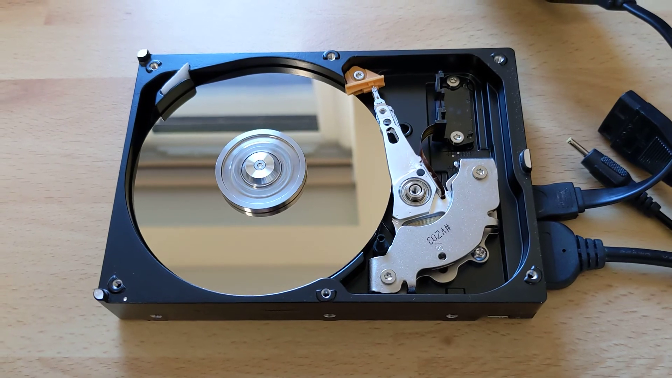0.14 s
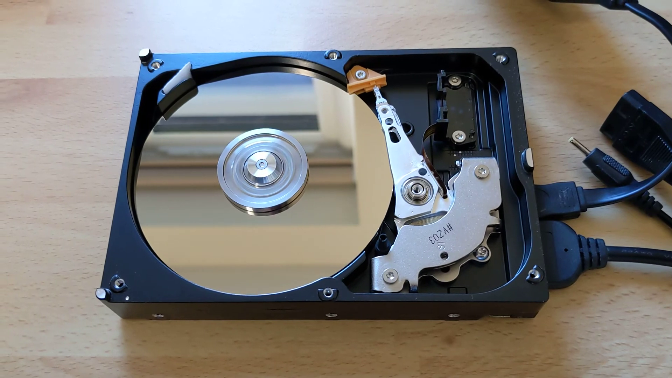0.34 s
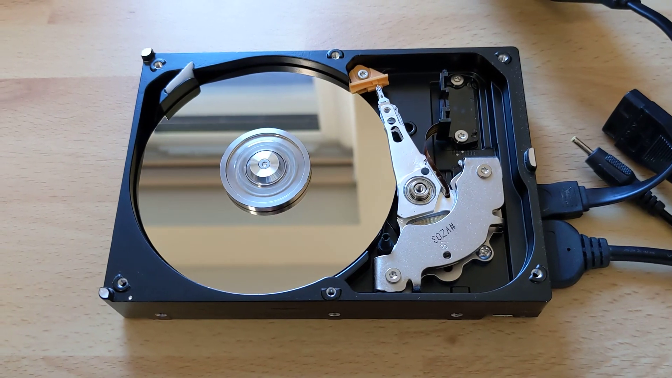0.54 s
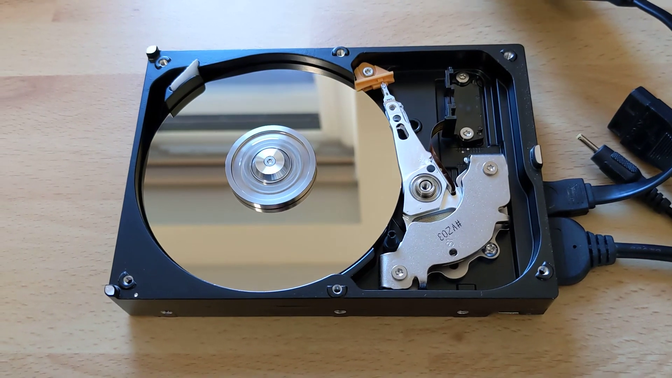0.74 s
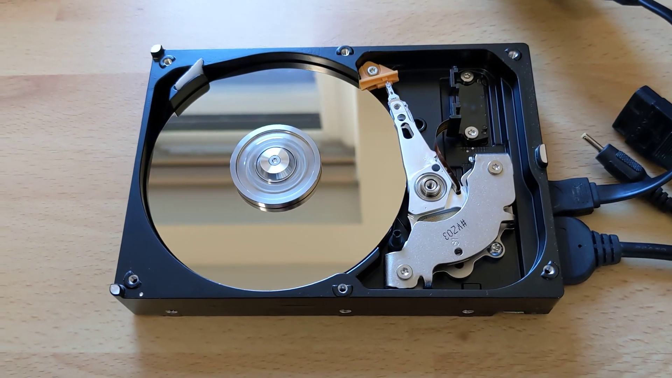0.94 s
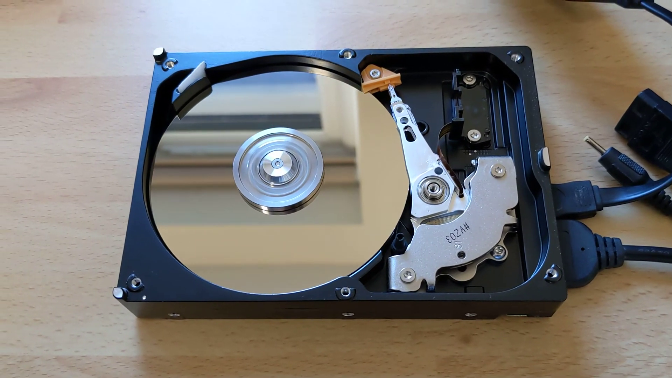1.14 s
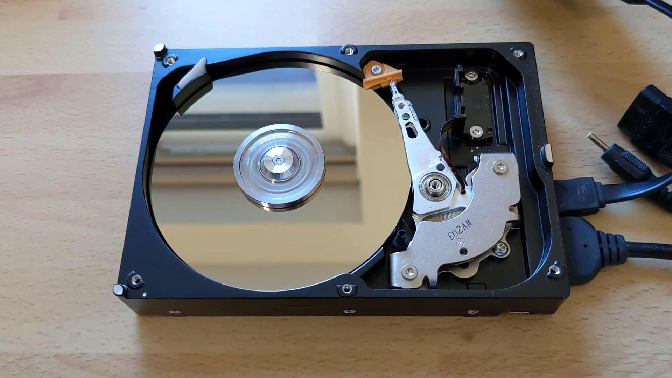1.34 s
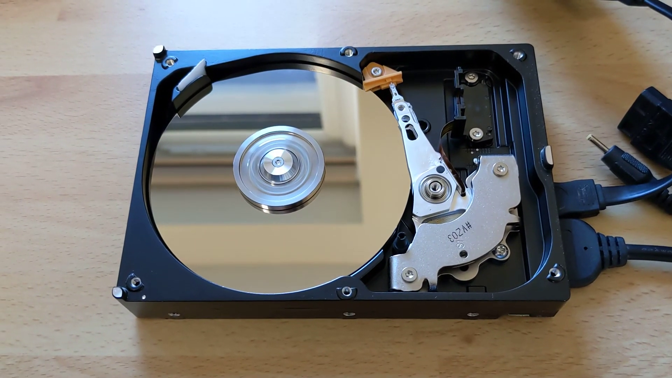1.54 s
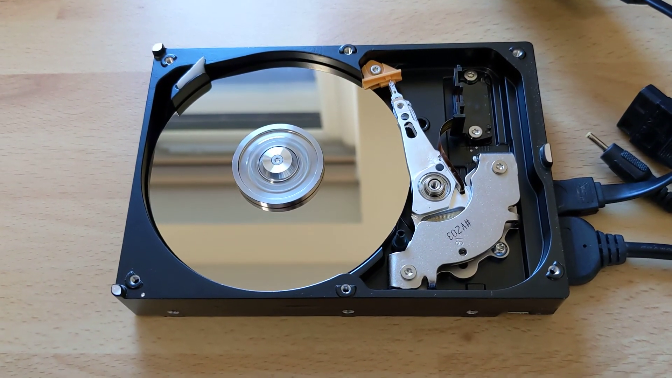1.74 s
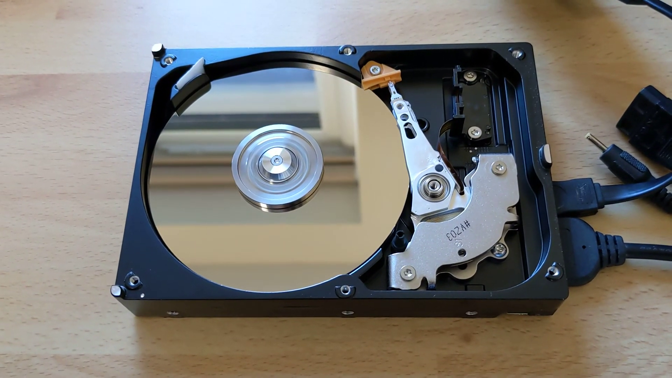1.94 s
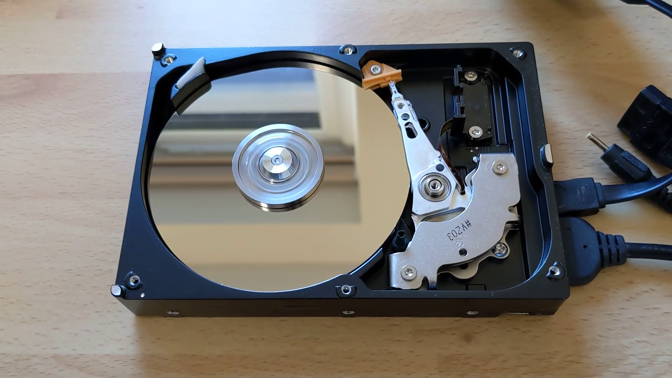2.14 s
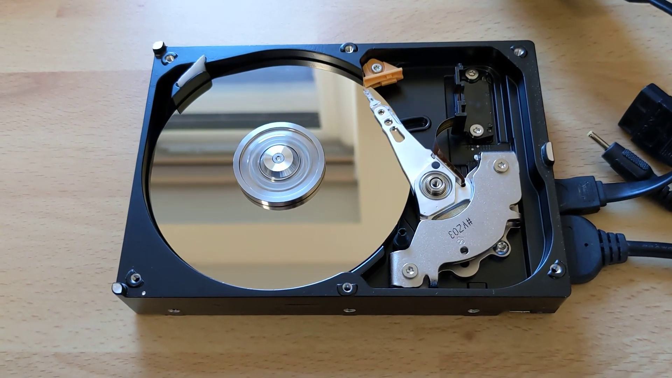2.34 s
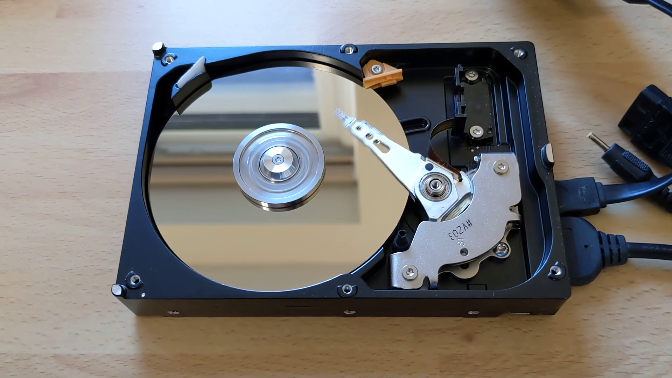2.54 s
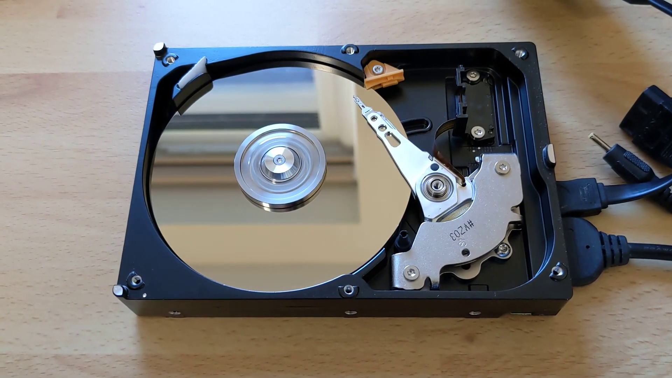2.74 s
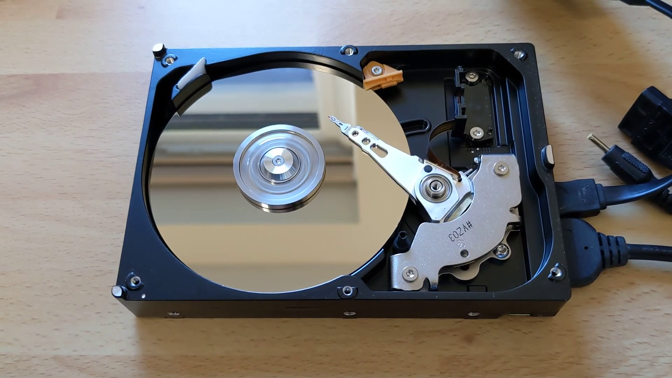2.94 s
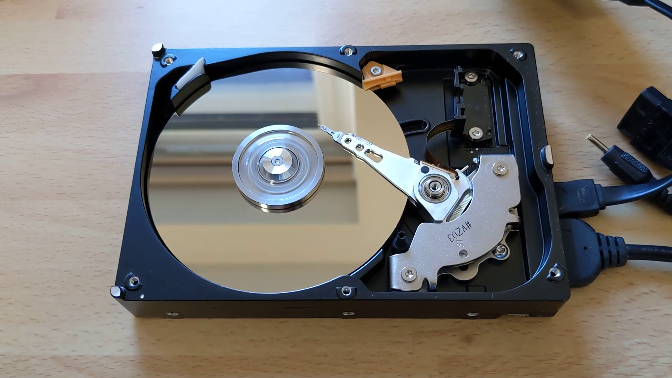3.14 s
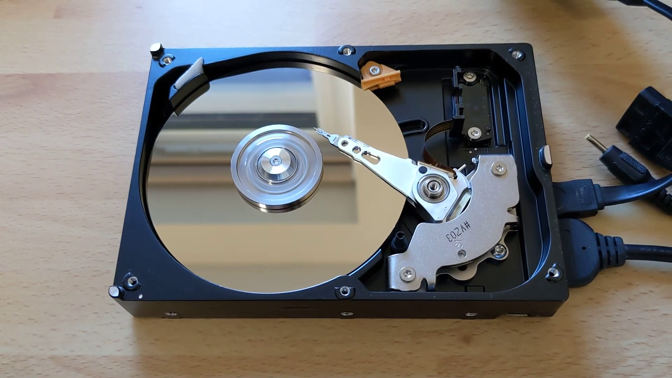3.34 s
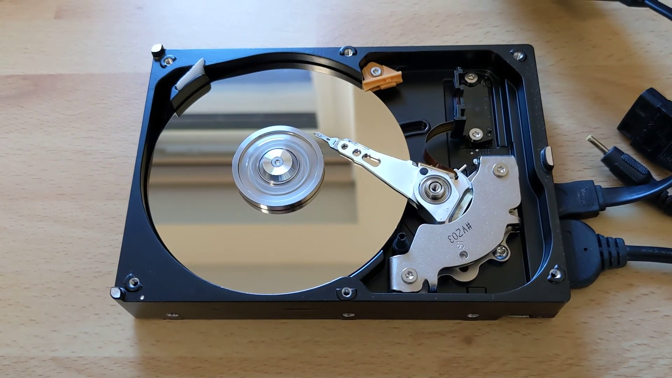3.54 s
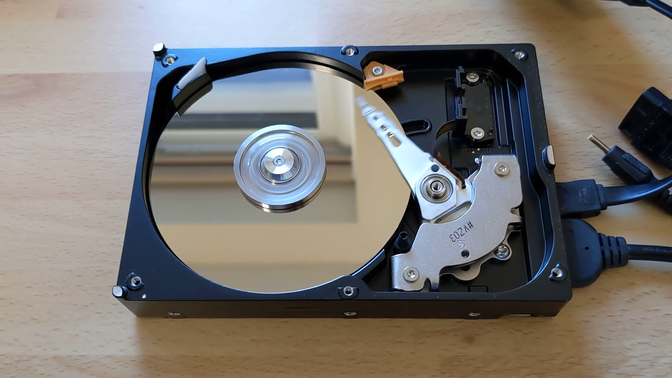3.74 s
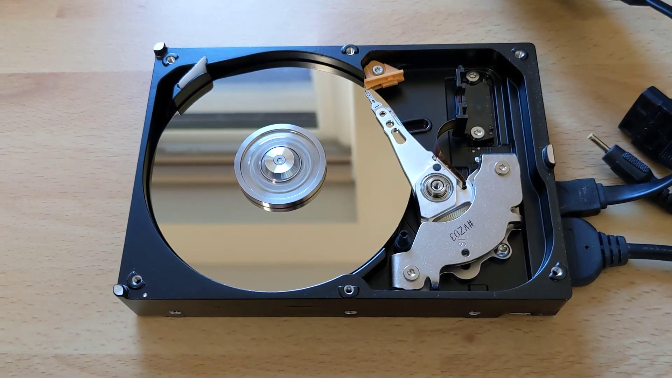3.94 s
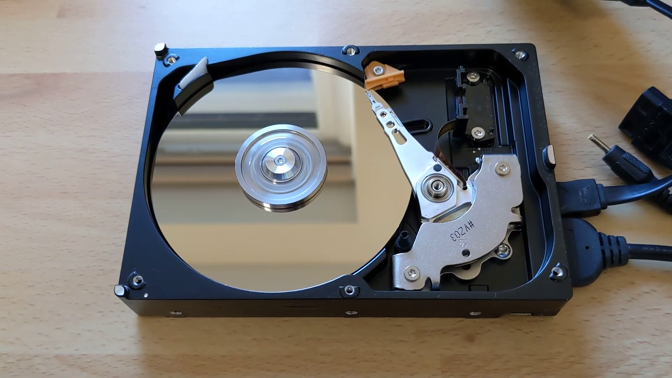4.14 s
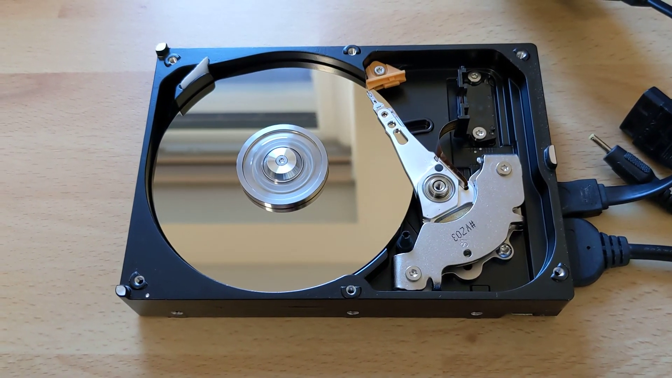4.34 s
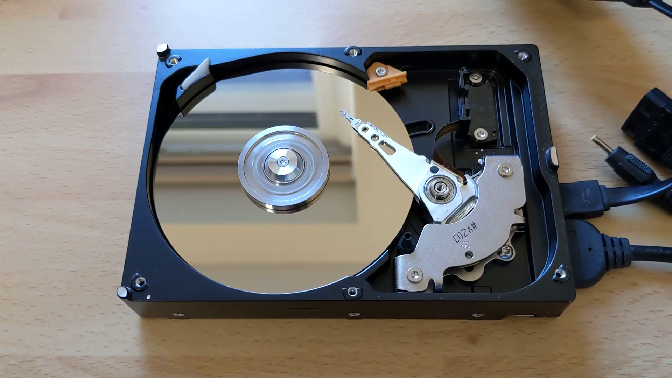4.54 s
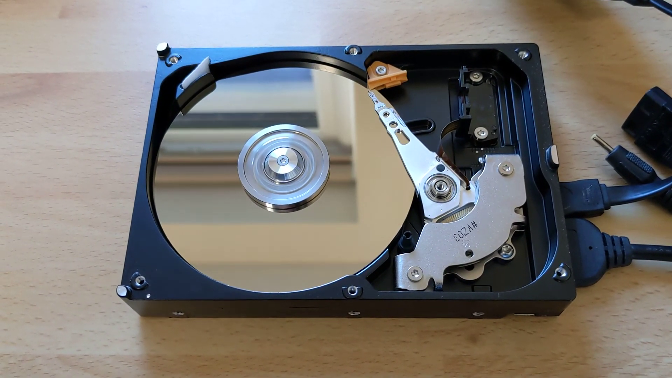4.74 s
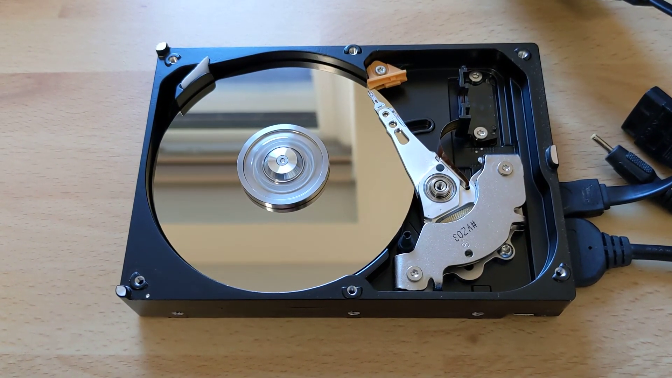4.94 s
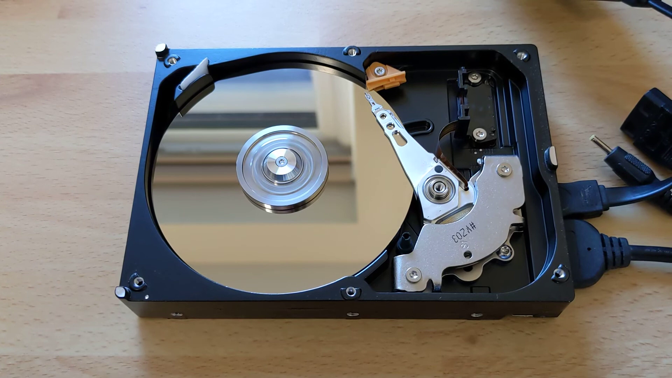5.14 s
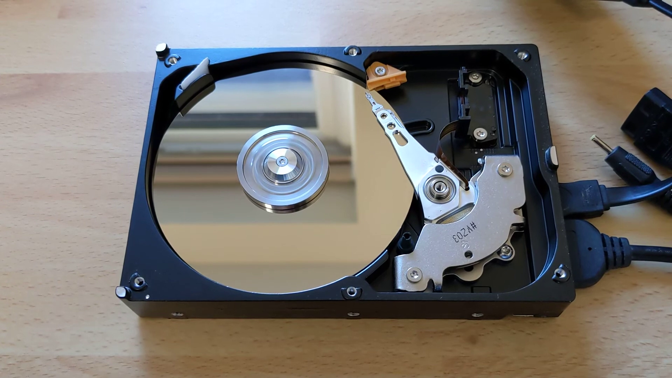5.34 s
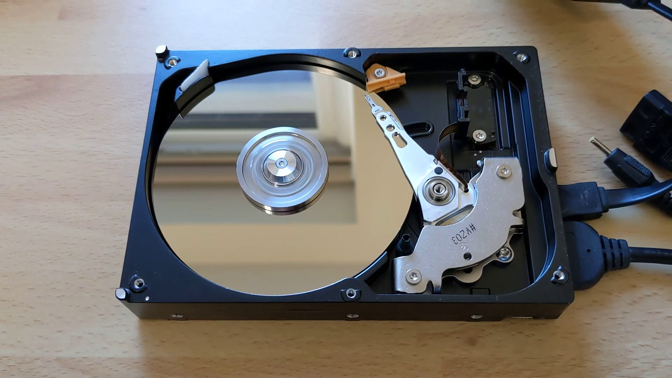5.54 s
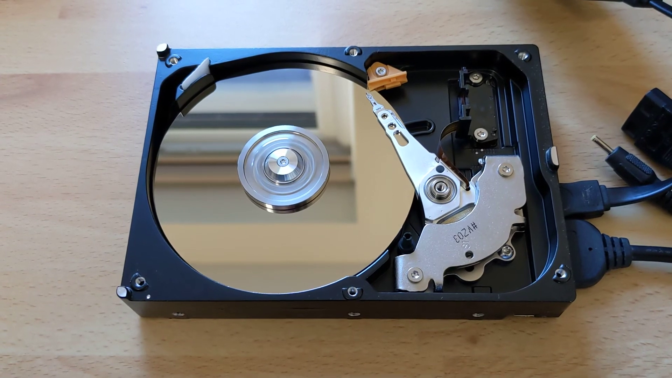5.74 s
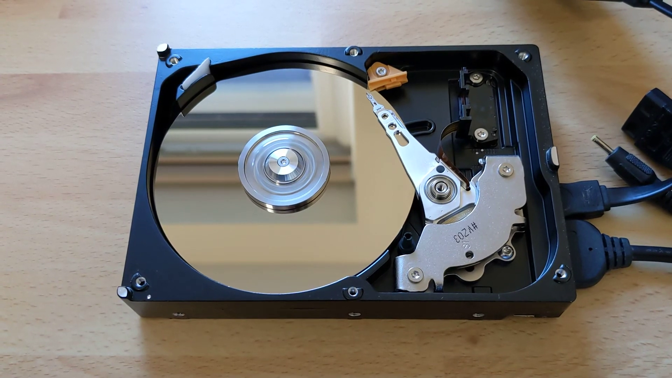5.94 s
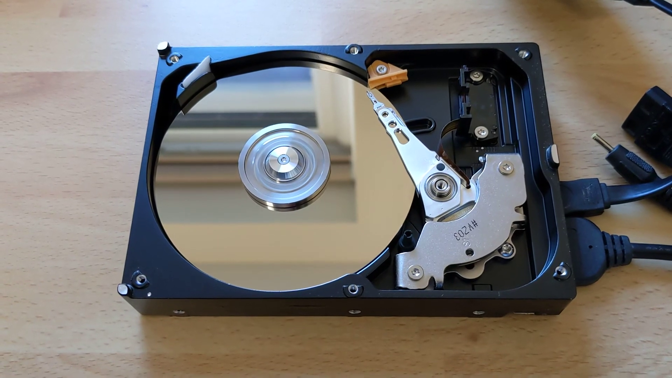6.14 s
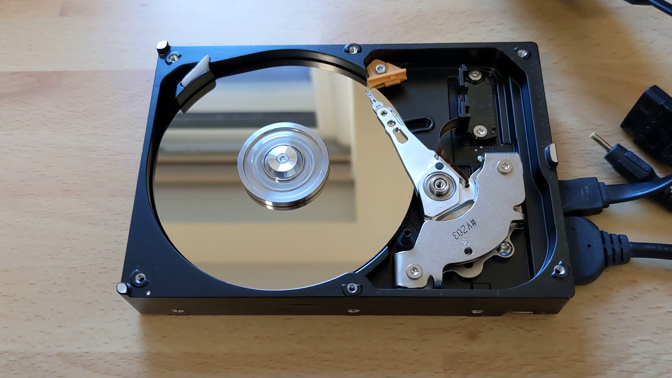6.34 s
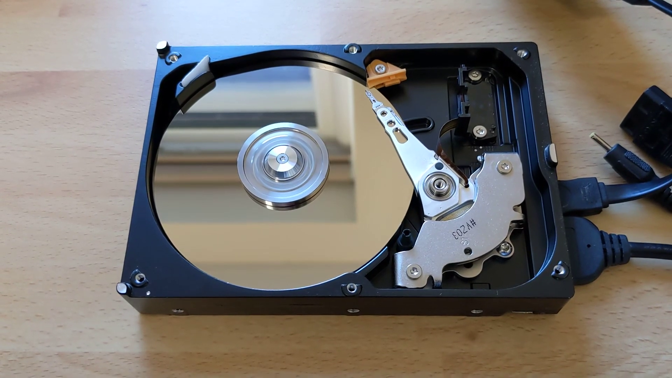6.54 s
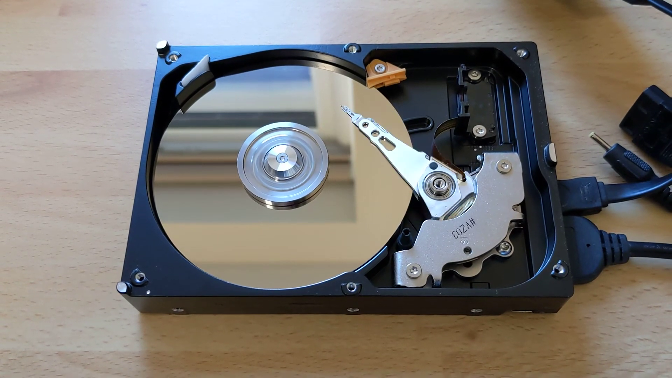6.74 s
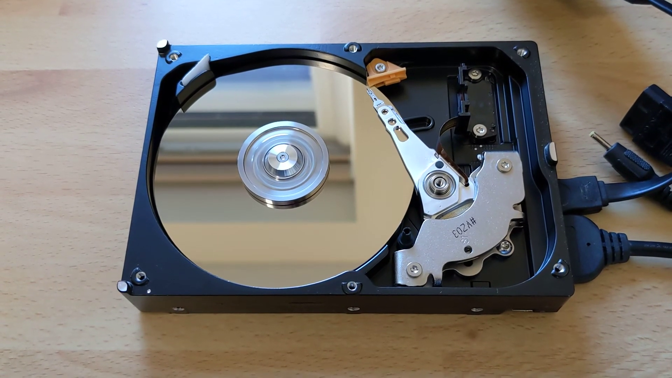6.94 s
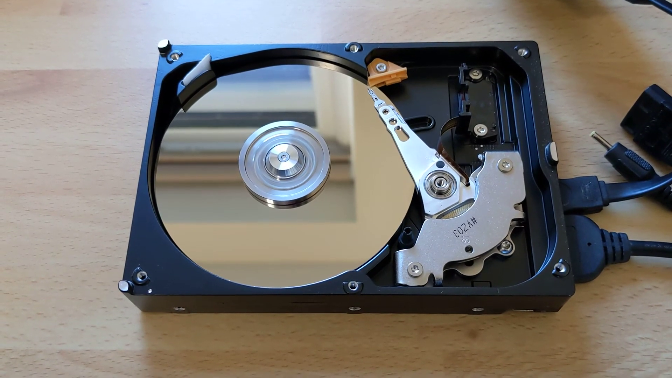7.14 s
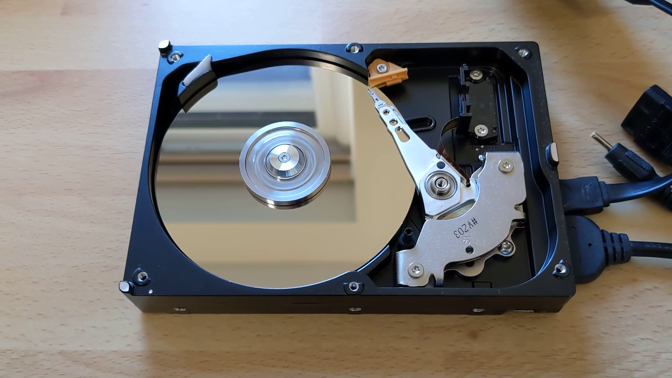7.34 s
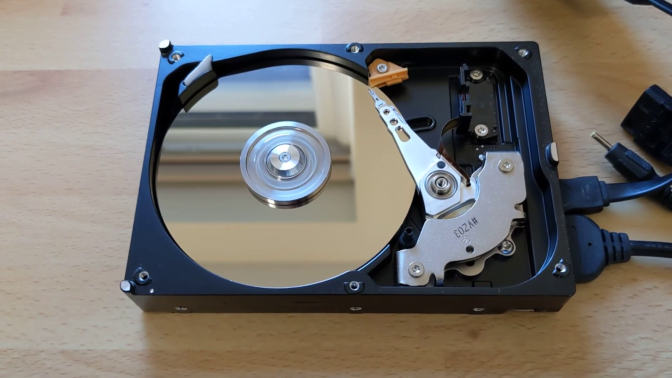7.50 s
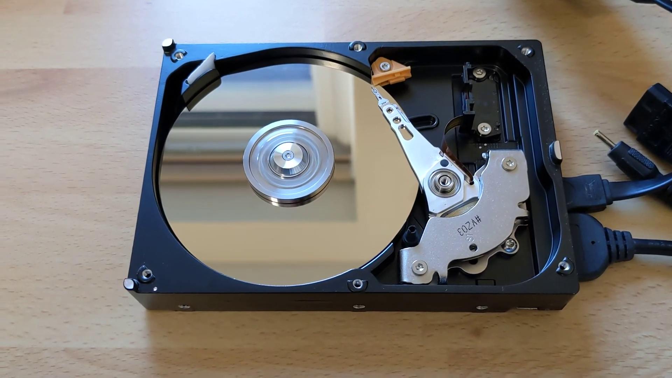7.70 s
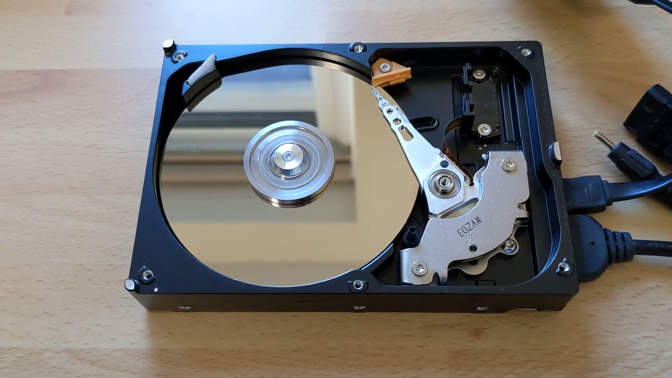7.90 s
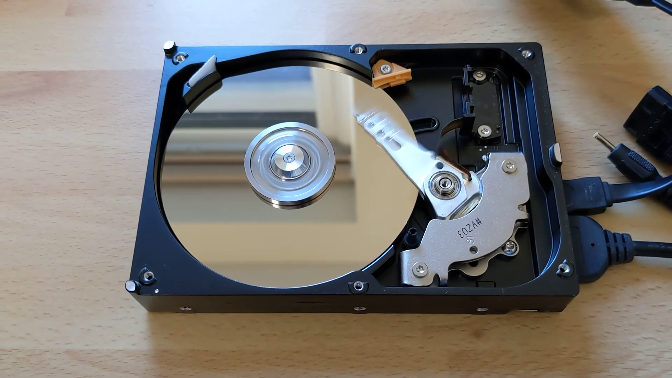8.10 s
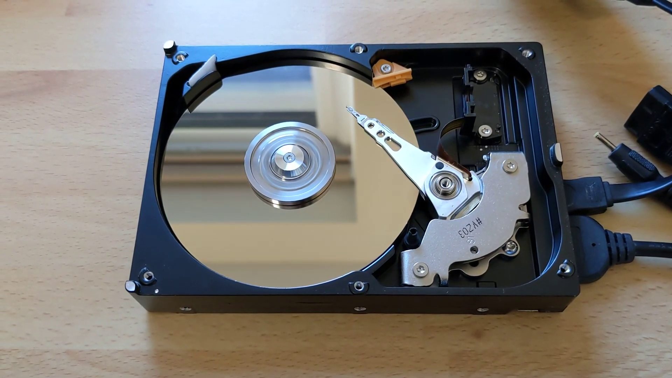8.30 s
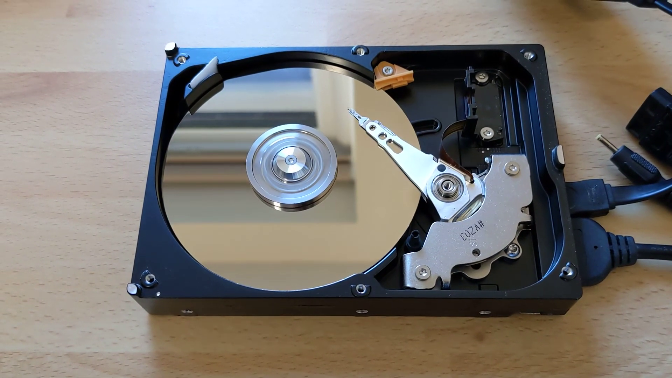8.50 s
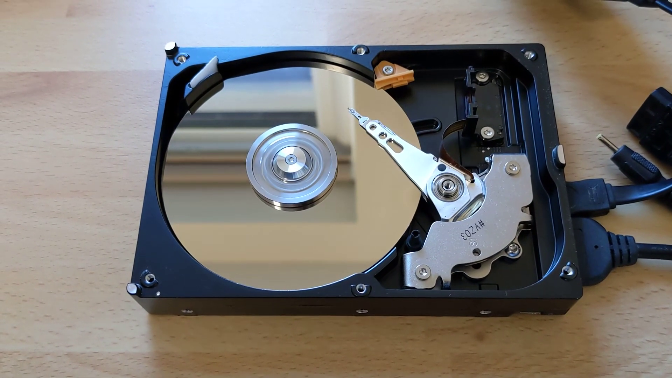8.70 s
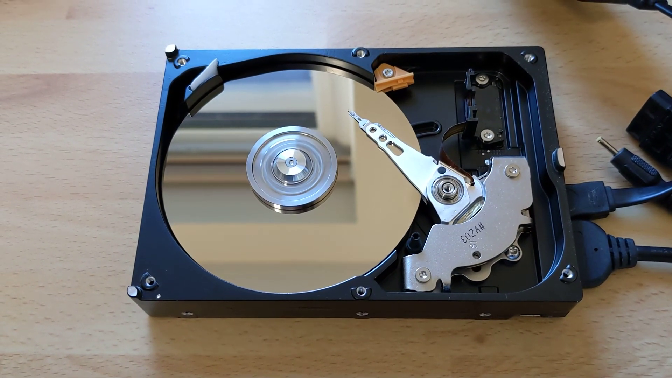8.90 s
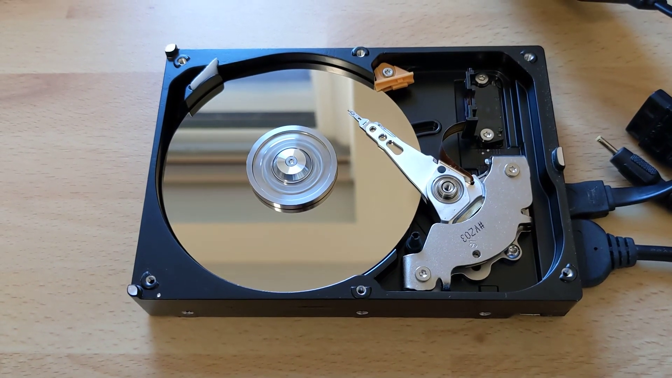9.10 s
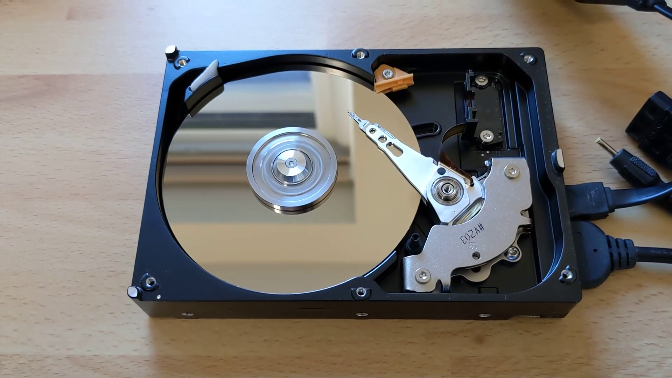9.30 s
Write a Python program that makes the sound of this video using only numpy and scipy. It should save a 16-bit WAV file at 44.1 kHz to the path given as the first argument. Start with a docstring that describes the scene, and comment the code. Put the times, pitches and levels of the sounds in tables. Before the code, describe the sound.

An open computer hard drive spins up from a soft airy whir to a steady bright hiss, its arm snapping and clicking in short bursts.

```python
"""A wooden desk in a quiet room: an open hard drive spins up to full speed, close to a phone with two ports.
Air dragged by the platters is shaped noise that grows louder and brighter with speed. The motor whines in
multiples of the shaft rate while it pulls. Each start and stop of the head arm kicks decaying modes of case
and arm, a crunch of small parts and a slower swell of the desk; once the heads sing one high tone.
Walls return a short tail, rumble and low hums lie behind, and the phone adds hiss and limits the band."""
import sys
import numpy as np
from scipy import signal
from scipy.fft import rfft, irfft, next_fast_len
from scipy.io import wavfile
from scipy.ndimage import uniform_filter1d

SR = 44100
rng = np.random.default_rng(int(sys.argv[2]) if len(sys.argv) > 2 else 0)


def unload_audio(sound):
    """Save the sound as a 16-bit wav file, at the path given as the first command line argument."""
    columns = np.transpose(np.atleast_2d(sound))
    # keep every value between -1 and 1, then stretch to whole-number steps
    steps = np.round(np.clip(columns, -1, 1) * 32767)
    wavfile.write(sys.argv[1], SR, steps.astype(np.int16))


N = 417186
TIME = np.arange(N) / SR  # s
SIZE = next_fast_len(N + 4096)
BINS_HZ = np.arange(SIZE // 2 + 1) * SR / SIZE + 1e-3  # offset keeps log and division finite

# spin-up: start speed, speed striven for, regulated speed (turns per s), time constant
START_TURNS_HZ, AIM_TURNS_HZ, FULL_TURNS_HZ, SPIN_UP_S = 59.5, 159.5, 120, 2.55
# air: reference rms before the speed law, treble step, growth per doubling of speed
AIR_DB, TREBLE_DB, AIR_DB_PER_OCT, TREBLE_DB_PER_OCT = -37.5, -2.5, 19, 11
# the arm swings in over the platters and changes the stream
LOAD_S, LOAD_TAKES_S, LOAD_DB, LOAD_TREBLE_DB = 2.47, 0.11, -1.38, 1.17
# motor: whine gain at its peak, slopes either side, hum of the unbalance at final speed
WHINE_PEAK_S, WHINE_DB, WHINE_RISE_DB_PER_S, WHINE_FALL_DB_PER_S = 0.97, -71, 4.5, 40
UNBALANCE_DB = -72
SING_S, SING_ATTACK_S, SING_HOLD_S, SING_RELEASE_S = 5.78, .03, 0.4, .5
SING_DB, SING_HZ = -59.5, 11186
# arm level rises by a part of the jolt's sharpness; desk pitch starts high by the sag share
ARM_DB, ARM_PER_SHARP, DESK_DB, DESK_SAG, DESK_SAG_S = 0.5, 0.73, -21.5, 0.22, 0.027
ROOM_DB, PHONE_HISS_DB, TOP_HZ = -65.5, -71, 15750


def undb(db):
    """Amplitude factor of a level in dB."""
    return 10 ** (np.asarray(db) / 20)


def level(x, db):
    """Scale to an rms in dB over all samples and channels."""
    return x * undb(db) / np.sqrt(np.mean(x ** 2))


def across(table):
    """A (Hz, value) table on every bin, linear in log frequency."""
    hz, value = np.transpose(table)
    return np.interp(np.log(BINS_HZ), np.log(hz), value)


def shape(x, gain):
    """Filter by a gain per frequency bin."""
    return irfft(rfft(x, SIZE) * gain, SIZE)[..., :N]


def ring(x, hz, t60_s):
    """One decaying mode: a two-pole resonator driven by x."""
    radius = np.exp(-np.log(1000) / (t60_s * SR))
    angle = 2 * np.pi * hz / SR
    return signal.lfilter([0, np.sin(angle)], [1, -2 * radius * np.cos(angle), radius * radius], x)


def walk(rate_hz):
    """Random levels held 1 / rate s and slewed twice."""
    k = int(SR / rate_hz)
    held = np.repeat(rng.standard_normal(N // k + 1), k)
    return uniform_filter1d(uniform_filter1d(held, k), k)[:N]


def tone(hz):
    """Sine of unit rms, fixed or gliding, from a random phase."""
    turns = np.cumsum(hz + np.zeros(N)) / SR
    return np.sqrt(2) * np.sin(2 * np.pi * (turns + rng.random()))


def far_port(ways, shade):
    """Gain to the left port: lows bend round the phone's edge, highs also come later, off the desk."""
    (edge_s, edge), (desk_s, desk) = ways
    high = 1 / (1 + (1400 / BINS_HZ) ** 4)
    turn = -2j * np.pi * BINS_HZ
    round_edge = (1 - high + edge * high) * np.exp(turn * edge_s)
    off_desk = desk * high * np.exp(turn * desk_s)
    return undb(across(shade)) * (round_edge + off_desk)


def spin():
    """Platter speed in turns per s: it climbs ever more slowly until the regulator holds it."""
    climb = AIM_TURNS_HZ - (AIM_TURNS_HZ - START_TURNS_HZ) * np.exp(-TIME / SPIN_UP_S)
    return np.minimum(climb, FULL_TURNS_HZ)


def air():
    """Turbulence at the platter rim; part of it reaches each port from another stretch of the rim."""
    # Broad hiss. Each row: frequency in Hz, relative density in dB per Hz.
    hiss = [(300, -27.5), (800, -23.5), (1350, -21.5), (2050, -20.5), (3450, -8), (4400, -13.5),
            (5800, -12.5), (7600, -13.5), (10500, -22.5), (12000, -20), (13200, -33), (13500, -27),
            (15200, -39), (15700, -44)]
    # Hollows of the open case. Each row: frequency in Hz, width in Hz, relative level in dB.
    hollow_rows = [(1063, 278, -13.5), (1673, 278, -6.5), (2737, 762, 0), (5050, 910, -11)]
    # Hiss common to both ports. Each row: frequency in Hz, share 0-1.
    alike_rows = [(300, 0.6), (1100, 0.88), (1600, 0.17), (3600, 0.51), (4400, 0.53), (6300, 0),
                  (8500, 0.12)]
    # Ways from rim to far port, round the edge then off the desk. Each row: delay in s, gain.
    rim_ways = [(.0002, .7), (.00177, .7)]
    # Shading of the far port from the rim. Each row: frequency in Hz, left minus right in dB.
    rim_shade = [(300, 0), (1050, -3), (1350, 1), (1700, -7), (2060, -1), (2750, -18), (3200, -13),
                 (3600, -4), (4450, -1), (5050, -6), (6500, 4), (8300, -6), (10800, -5), (14000, 0)]

    octaves = np.log2(spin() / FULL_TURNS_HZ)
    loaded = np.clip((TIME - LOAD_S) / LOAD_TAKES_S, 0, 1)
    air_db = AIR_DB_PER_OCT * octaves + LOAD_DB * loaded
    treble_db = TREBLE_DB + TREBLE_DB_PER_OCT * octaves + LOAD_TREBLE_DB * loaded

    near, other = rng.standard_normal((2, N))
    alike = np.clip(across(alike_rows), 0, 1)
    left = shape(near, alike * far_port(rim_ways, rim_shade))
    left = left + shape(other, np.sqrt(1 - alike ** 2) * undb(across(rim_shade)))

    hollows = 0  # broad, steep-sided resonances
    for hz, width_hz, db in hollow_rows:
        hollows = hollows + undb(db) / (1 + ((BINS_HZ - hz ** 2 / BINS_HZ) / width_hz) ** 4)
    both = shape(np.array([left, near]), np.hypot(hollows, undb(across(hiss))))
    treble = shape(both, 1 / (1 + (4500 / BINS_HZ) ** 4))
    both = both + (undb(treble_db + .9 * walk(12)) - 1) * treble
    return level(both, AIR_DB) * undb(air_db + .7 * walk(6))


def jolts():
    """Each jolt is a kick and a short rattle that ring case and arm; the desk swells up more slowly."""
    # Arm starts and stops. Each row: start in s, level in dB, sharpness in dB, rattle time constant in s.
    jolt_rows = [(2.664, -20.5, -10, 0.0045), (2.675, -27, -9, .004), (2.6963, -26, -4, 0.00078),
                 (2.8915, -21.5, -8.5, 0.0011), (2.9104, -28.5, -11, .003), (3.1296, -24, -7, 0.0032),
                 (3.3446, -21.5, -11, 0.0051), (3.553, -18.5, -12, 0.0063), (3.7476, -23, -12, .004),
                 (3.765, -21.5, -9.5, 0.0057), (3.806, -26.5, -13, .003), (3.817, -31.5, -5, .003),
                 (3.873, -19.5, -8, .0012), (4.616, -26.5, -2, .003), (4.6243, -17, 3.5, 0.0028),
                 (4.629, -18.5, -4.5, 0.0039), (4.645, -31, -8, .003), (4.6873, -19.5, 4, .004),
                 (4.6898, -22.5, 7.5, 0.0023), (4.729, -27, -11, 0.0034), (4.741, -26, 1, .004),
                 (4.751, -16.5, -3, 0.004), (4.7594, -15, -5, 0.005), (4.7677, -28, -10, 0.0034),
                 (5.251, -20.5, -6.5, 0.0018), (5.5404, -24.5, -9, 0.0034), (5.561, -16.5, -15, 0.0023),
                 (6.749, -28, -14, .003), (6.756, -17, -7, 0.0012), (6.7875, -18.5, -5, 0.0038),
                 (6.7922, -22.5, 4.5, 0.0064), (6.801, -19.5, -10, 0.0026), (6.8103, -16.5, -10, 0.0035),
                 (6.82, -21.5, -4, 0.0033), (6.9462, -12.5, -7.5, 0.0013), (6.956, -21, -2, 0.0027),
                 (8.2163, -22, -16, 0.0018), (8.2228, -22, -2.5, 0.0025), (8.23, -20.5, -10, 0.0054)]
    # Modes of case, arm and bright parts. Each row: frequency in Hz, level in dB, t60 in s.
    case_modes = [(786, -30, 0.17), (953, -24, 0.097), (1072, -20.5, 0.067), (1716, -14, 0.083),
                  (1808, -6, 0.051), (1917, -8, 0.048), (1997, -15.5, 0.057)]
    arm_modes = [(2800, -8, .02), (3340, 3, .028), (3700, -2, .022), (3910, -4, .022), (4320, -4, .025)]
    bright_modes = [(4900, -1, .025), (5200, -4, .03), (5530, 2, .028), (6650, -9, .022), (7400, -12, .018),
                    (8050, -12, .018), (8700, -15, .02), (9300, -16, .02), (10500, -18, .02),
                    (11410, -12, .03), (12000, -15, .02), (12800, -20, .018)]
    # Desk modes. Each row: frequency in Hz, level in dB, rise time constant in s, t60 in s.
    desk_modes = [(133.3, -6, 0.025, 0.25), (195, -2.5, 0.0062, 0.09), (559, -11.5, 0.0063, 0.1)]

    out, span = np.zeros((2, N + SR)), TIME[:SR // 3]
    # phase time of the desk: pitch sags as it swings out
    sagging = span + DESK_SAG * DESK_SAG_S * (1 - np.exp(-span / DESK_SAG_S))
    small = signal.butter(2, 900, "high", fs=SR, output="sos")
    soft = signal.butter(1, 6000, fs=SR, output="sos")
    for start_s, db, bright_db, rattle_s in jolt_rows:
        arm_db = ARM_DB + ARM_PER_SHARP * bright_db
        fade = np.exp(-span / max(rattle_s, 3e-4))
        kick = 0.48 * np.sqrt(np.sum(fade ** 2)) * (span == 0)
        sound = 0
        for modes, part_db in [(case_modes, 0.), (arm_modes, arm_db), (bright_modes, bright_db)]:
            for hz, mode_db, t60_s in modes:
                blow = kick * rng.choice((-1, 1)) + fade * rng.standard_normal(len(span))
                mode = ring(blow, hz * (1 + .005 * rng.standard_normal()), t60_s)
                gain = undb(part_db + mode_db + 1.8 * rng.standard_normal())
                sound = sound + gain * mode / np.abs(mode).max()

        # many small parts: a broad crunch with a short tail, partly different at each port
        shared, *own = rng.standard_normal((3, len(span)))
        grit = signal.sosfilt(soft, shared + 1.15 * np.array(own))
        crunch = (fade + 0.57 * np.exp(-span / 0.028)) * grit
        # parts this small radiate little bass
        sound = signal.sosfilt(small, sound + undb(-9 + .5 * (arm_db + bright_db)) * crunch)

        for hz, mode_db, rise_s, t60_s in desk_modes:
            swell = (1 - np.exp(-span / rise_s)) ** 2 * np.exp(-np.log(1000) * span / t60_s)
            swing = np.sin(2 * np.pi * (hz * sagging + rng.random()))
            sound = sound + undb(DESK_DB + mode_db) * swell * swing
        at = int(start_s * SR)
        out[:, at:at + len(span)] += undb(db) * sound
    return out[:, :N]


def motor():
    """Cogging orders and drive noise sound through the housing while the motor pulls; unbalance hums once a turn."""
    # Cogging orders. Each row: multiple of the shaft rate, relative level in dB.
    orders = [(24, 12), (144, 4), (168, 0), (180, 12)]
    # Housing resonances. Each row: frequency in Hz, width in Hz, gain in dB.
    housing_rows = [(1900, 500, -8), (5380, 400, 5), (8600, 600, -8), (9500, 600, -10), (11950, 900, -10),
                    (14000, 2500, -12)]

    turns_hz, late_s = spin(), TIME - WHINE_PEAK_S
    pull_db = WHINE_DB + np.minimum(WHINE_RISE_DB_PER_S * late_s, -WHINE_FALL_DB_PER_S * late_s)
    cogging = 0
    for order, db in orders:
        order_hz = order * turns_hz
        in_band = order_hz < .45 * SR
        cogging = cogging + undb(db + 3 * walk(16.5)) * tone(order_hz) * in_band
    drive = undb(24) * rng.standard_normal(N)
    housing = 0
    for hz, width_hz, db in housing_rows:
        housing = housing + undb(db) / (1 + (2 * (BINS_HZ - hz) / width_hz) ** 2)
    whine = shape((cogging + drive) * undb(pull_db), housing)
    unbalance_gain = undb(UNBALANCE_DB + 0.71 * walk(4)) * (turns_hz / turns_hz[-1]) ** 4
    return whine + unbalance_gain * tone(turns_hz)


def sing():
    """The heads sing one wavering high tone while they hold one track."""
    rise = np.clip((TIME - SING_S) / SING_ATTACK_S, 0, 1)
    fall = np.clip(1 - (TIME - SING_S - SING_ATTACK_S - SING_HOLD_S) / SING_RELEASE_S, 0, 1)
    return rise * fall * undb(SING_DB + 2.5 * walk(25)) * tone(SING_HZ)


def ports(x):
    """One sound, or one for each port, as left (far) and right (near) hear it."""
    # Ways from arm to far port, round the edge then off the desk. Each row: delay in s, gain.
    arm_ways = [(.0001, .35), (.0017, .85)]
    # Shading of the far port from the arm. Each row: frequency in Hz, left minus right in dB.
    arm_shade = [(300, 1), (1100, -12), (1800, 0.5), (2700, -5), (3350, -23), (4300, 2), (5500, -49),
                 (6800, 6.5), (8000, -2), (12000, -3)]
    x = x + np.zeros((2, N))
    return np.array([shape(x[0], far_port(arm_ways, arm_shade)), x[1]])


def walls(struck):
    """Nearby walls return the jolts as a short tail of decaying noise, different at each port."""
    span = TIME[:SR // 4]
    tail = rng.standard_normal((2, SR // 4)) * np.exp(-np.log(1000) * span / 0.25)
    return undb(-41) * signal.fftconvolve(struck, tail, axes=1)[:, :N]


def room():
    """Low rumble, partly shared by the ports, and wavering hum tones equal at both."""
    # Rumble spectrum. Each row: frequency in Hz, relative density in dB per Hz.
    rumble_rows = [(15, -59), (25, -4), (37, -17.5), (91, -2.5), (118, -8), (303, -7), (350, -15),
                   (461, -10), (1200, -15), (1560, -51), (2640, -120)]
    # Hum tones. Each row: frequency in Hz, mean level in dB rms.
    hum_rows = [(60, -73.5), (90.5, -68.5), (150.5, -77), (220.5, -75.5)]
    mid, side = shape(rng.standard_normal((2, N)), undb(across(rumble_rows)))
    rumble = level(mid + 0.56 * side * np.array([[1], [-1]]), ROOM_DB)
    return rumble + sum(undb(db + 2.8 * walk(4.9)) * tone(hz) for hz, db in hum_rows)


def scene():
    """Sum of the drive as both ports hear it, the wall tail and the room."""
    struck = jolts()
    return ports(struck + motor() + sing()) + walls(struck) + air() + room()


def record(dry):
    """The phone adds its own faint hiss, drops the deep bass and cuts the top."""
    x = dry + undb(PHONE_HISS_DB) * rng.standard_normal(dry.shape)
    x = signal.sosfilt(signal.butter(2, 45, "high", fs=SR, output="sos"), x)
    return signal.sosfilt(signal.ellip(10, .2, 75, TOP_HZ, fs=SR, output="sos"), x)


dry = scene()
out = record(dry)
unload_audio(out)
```